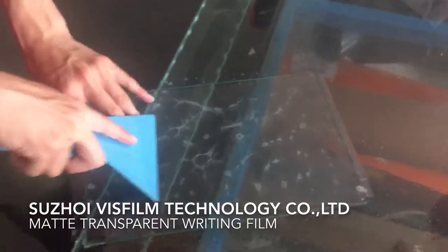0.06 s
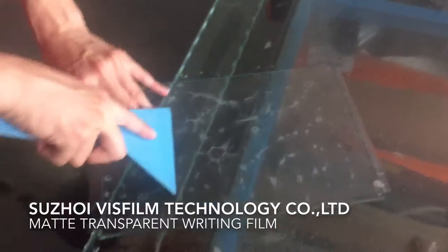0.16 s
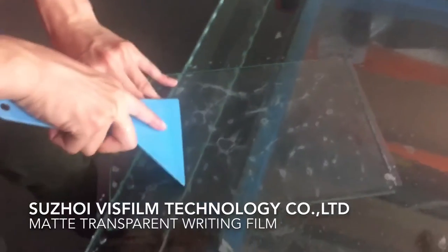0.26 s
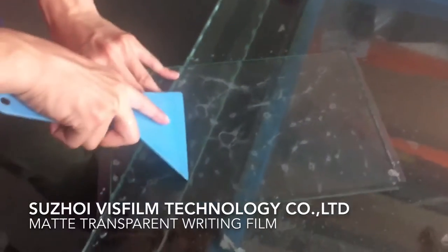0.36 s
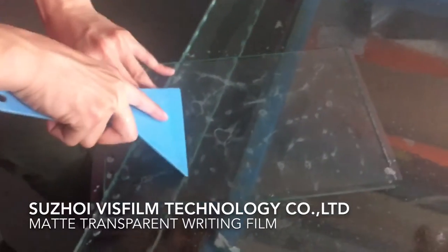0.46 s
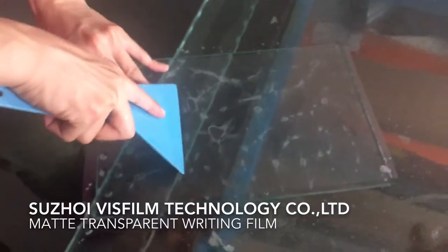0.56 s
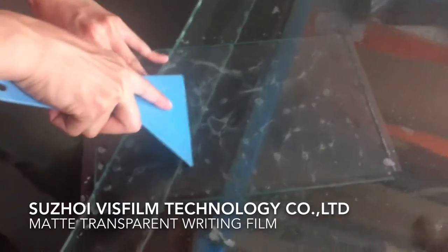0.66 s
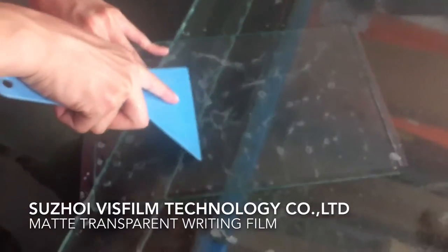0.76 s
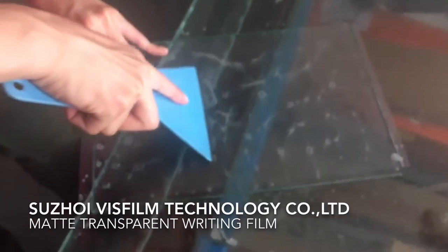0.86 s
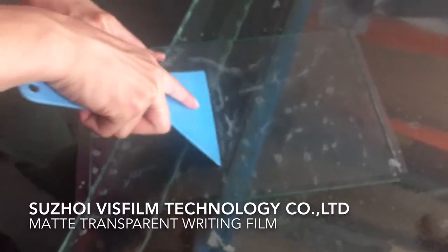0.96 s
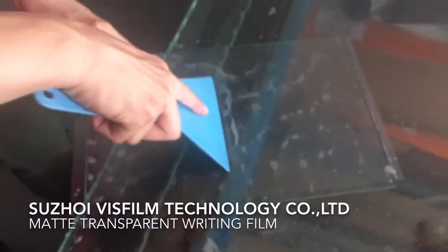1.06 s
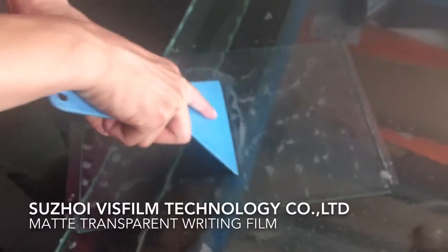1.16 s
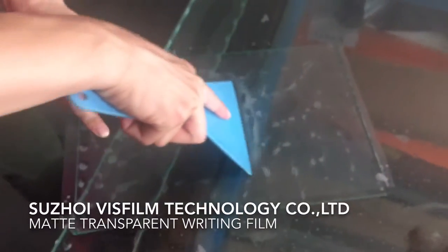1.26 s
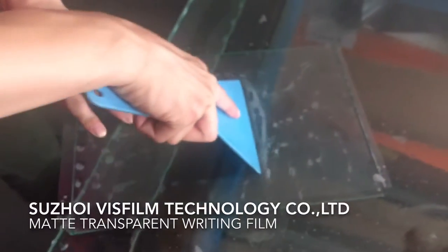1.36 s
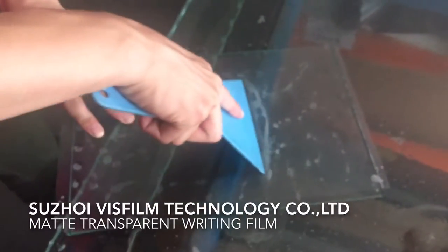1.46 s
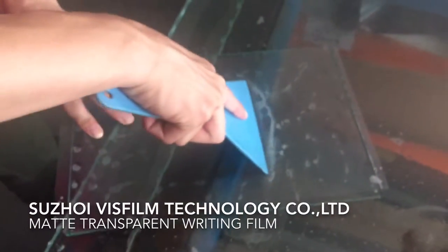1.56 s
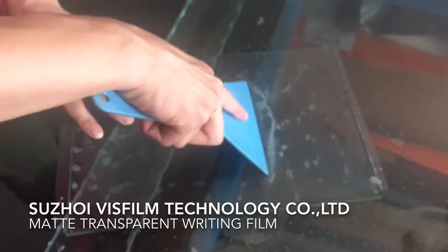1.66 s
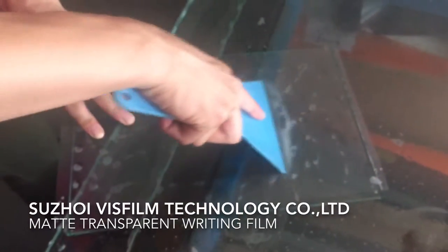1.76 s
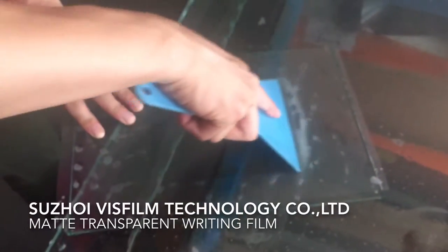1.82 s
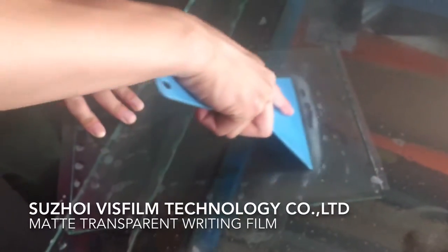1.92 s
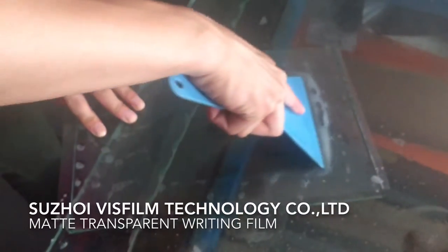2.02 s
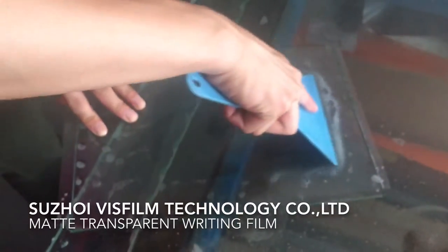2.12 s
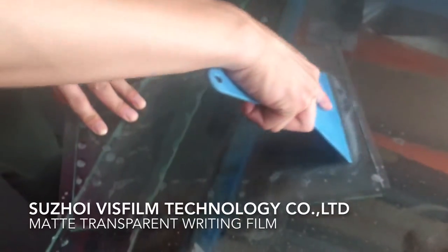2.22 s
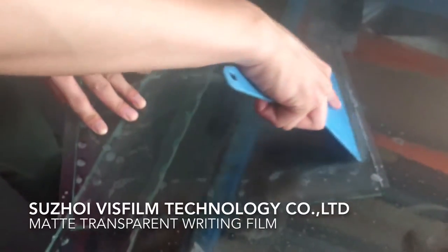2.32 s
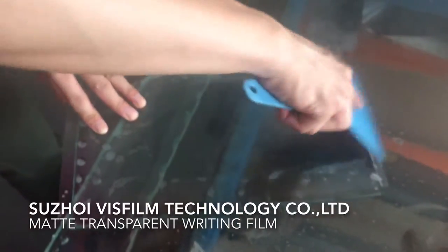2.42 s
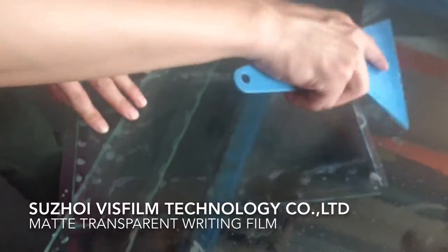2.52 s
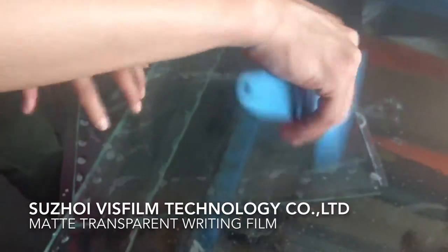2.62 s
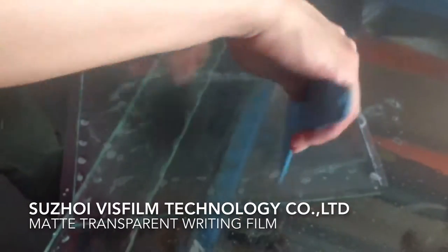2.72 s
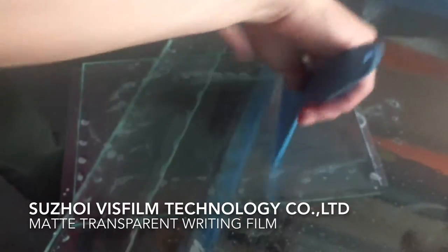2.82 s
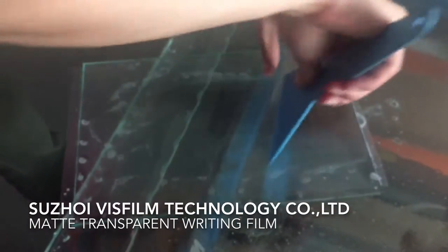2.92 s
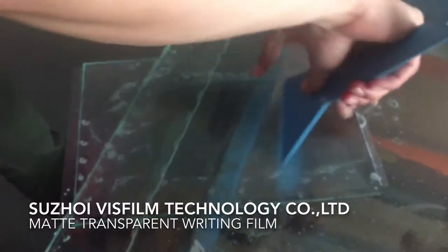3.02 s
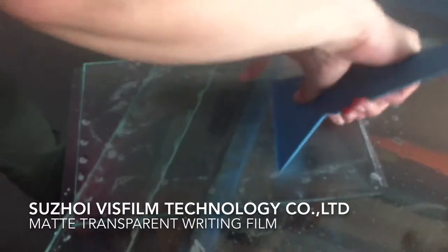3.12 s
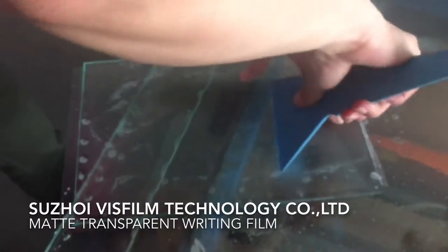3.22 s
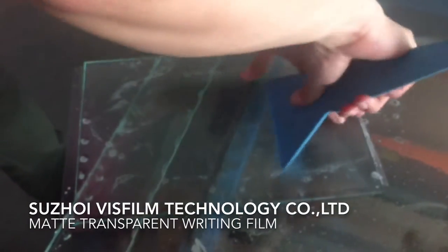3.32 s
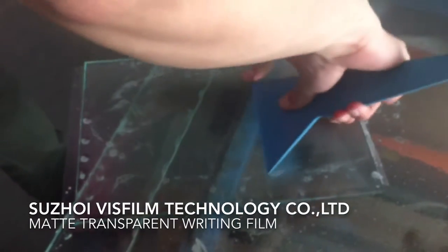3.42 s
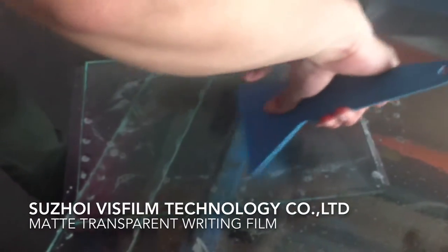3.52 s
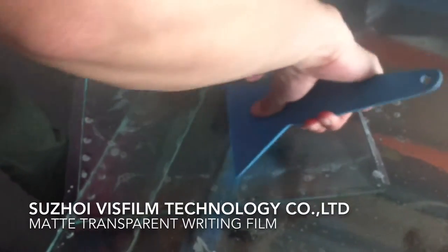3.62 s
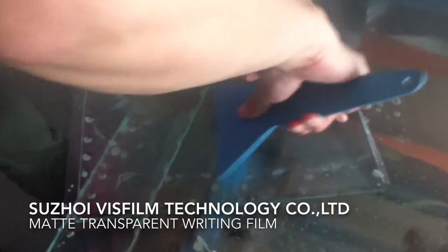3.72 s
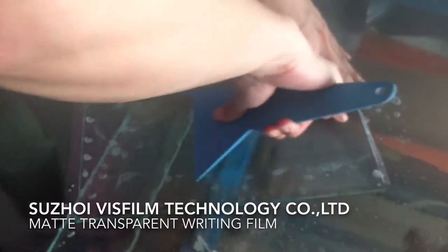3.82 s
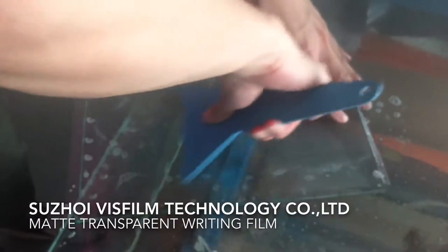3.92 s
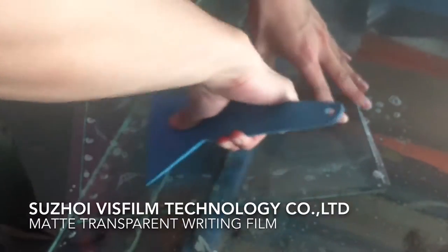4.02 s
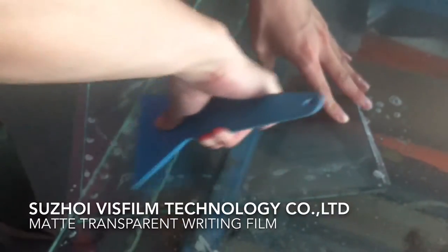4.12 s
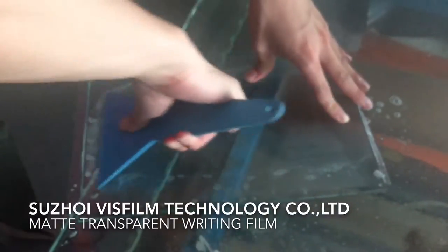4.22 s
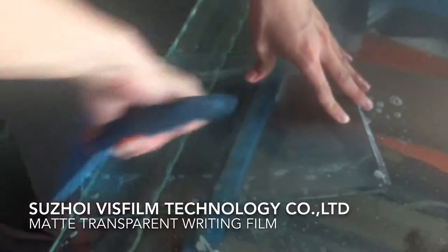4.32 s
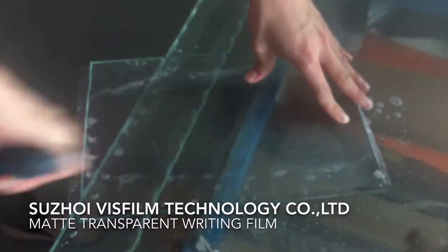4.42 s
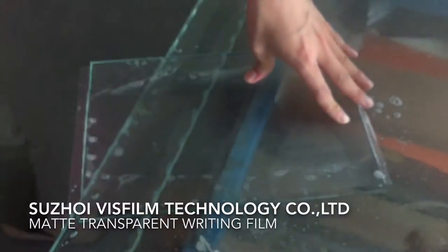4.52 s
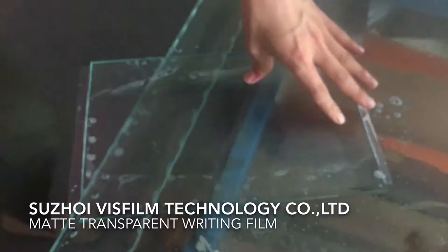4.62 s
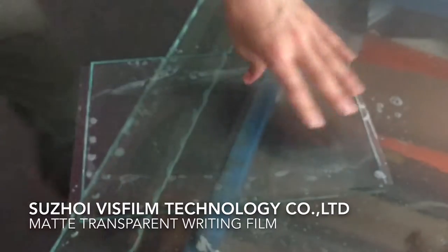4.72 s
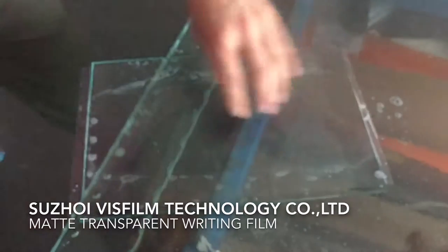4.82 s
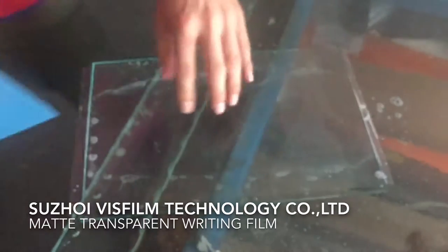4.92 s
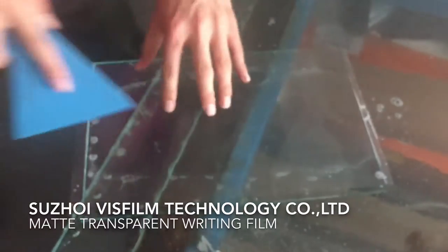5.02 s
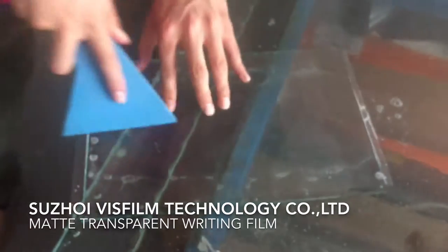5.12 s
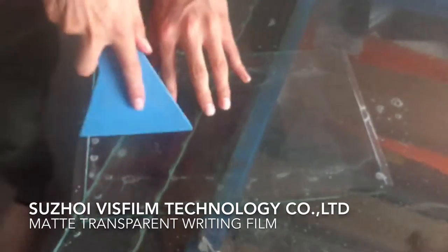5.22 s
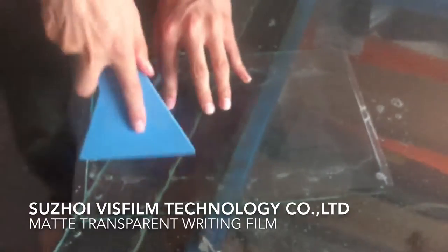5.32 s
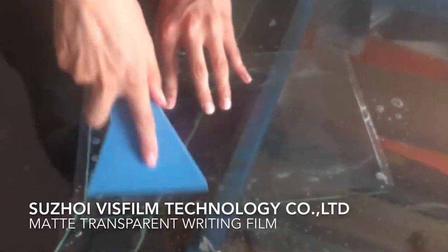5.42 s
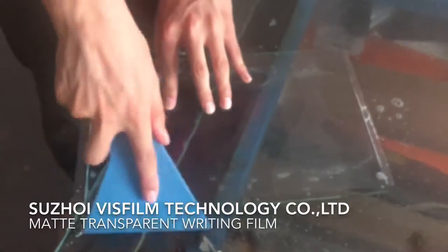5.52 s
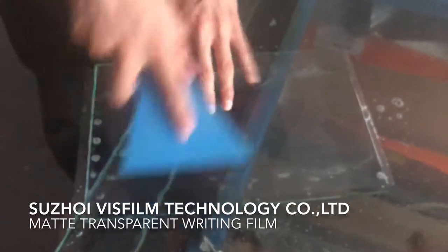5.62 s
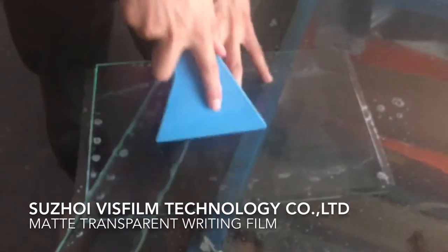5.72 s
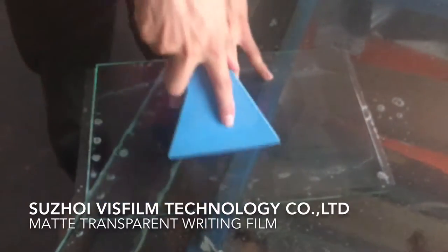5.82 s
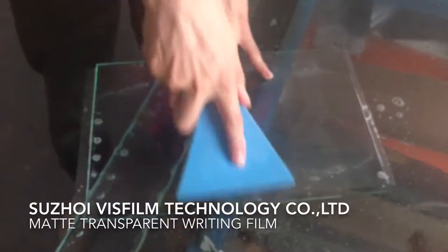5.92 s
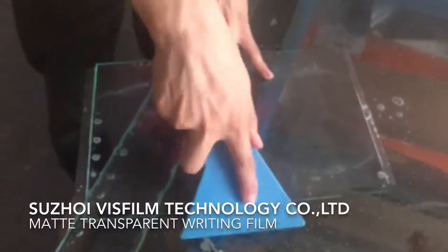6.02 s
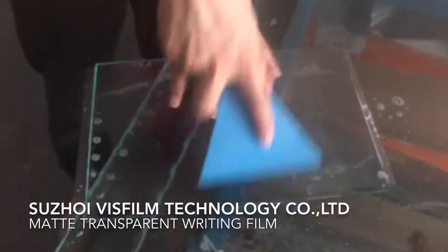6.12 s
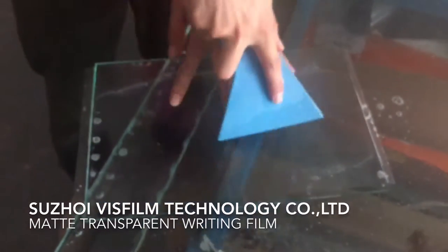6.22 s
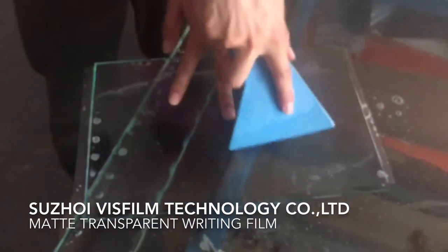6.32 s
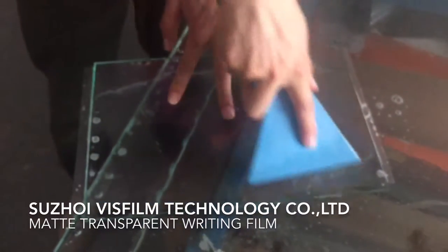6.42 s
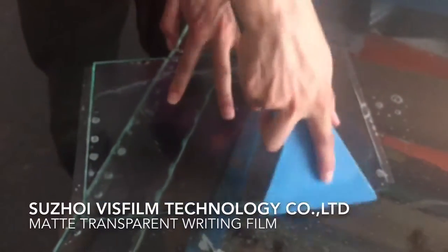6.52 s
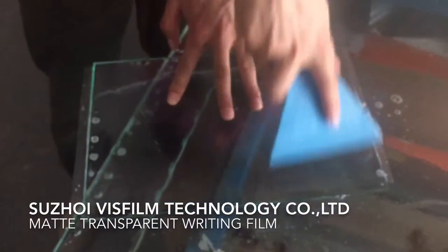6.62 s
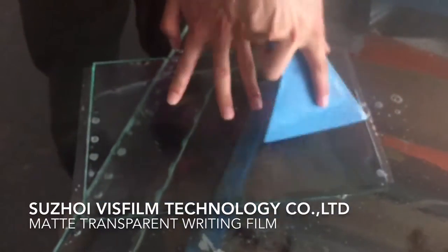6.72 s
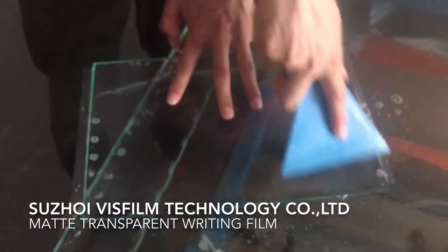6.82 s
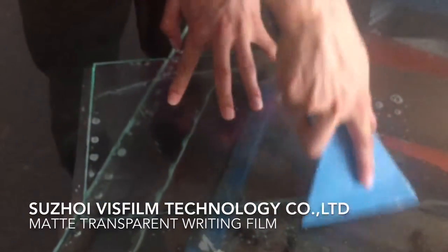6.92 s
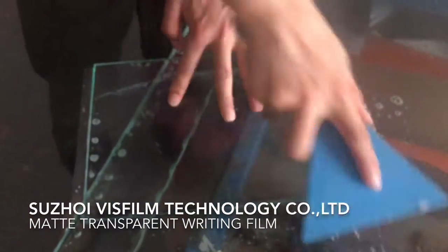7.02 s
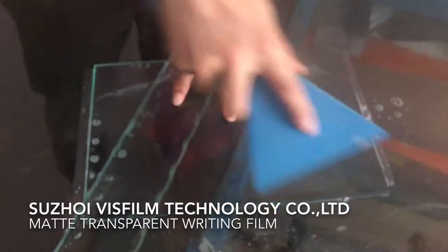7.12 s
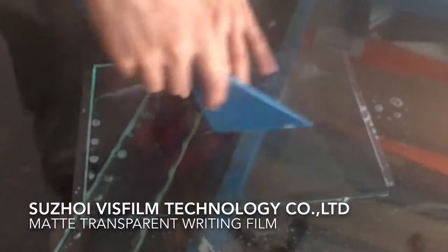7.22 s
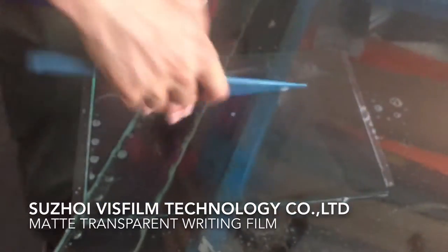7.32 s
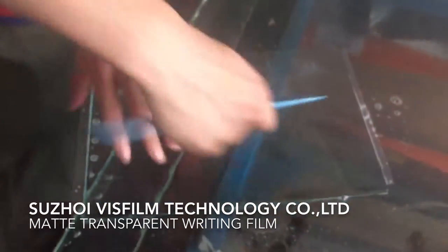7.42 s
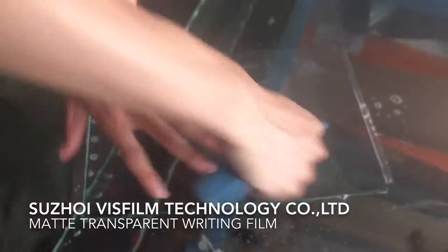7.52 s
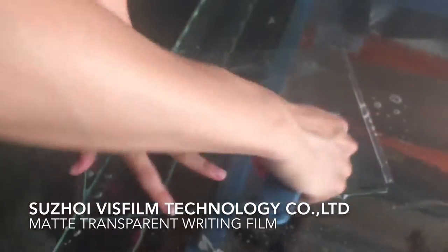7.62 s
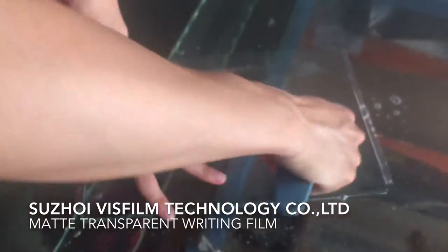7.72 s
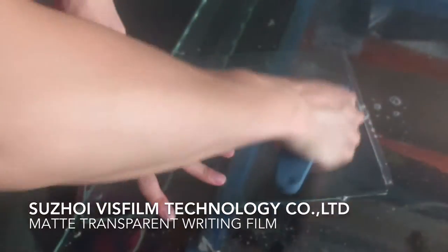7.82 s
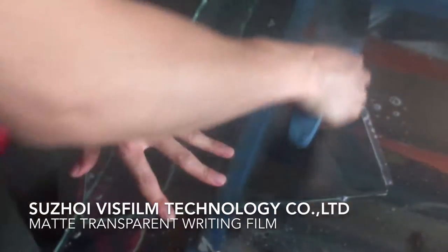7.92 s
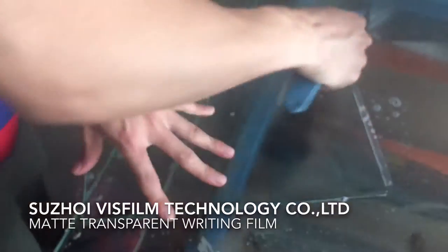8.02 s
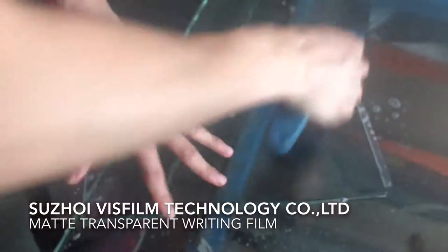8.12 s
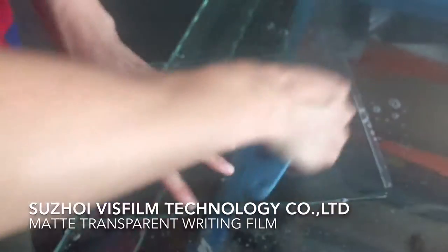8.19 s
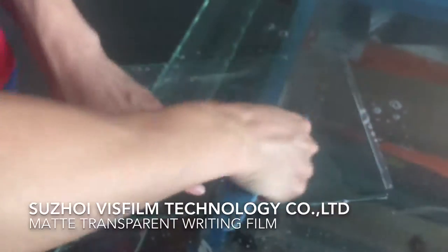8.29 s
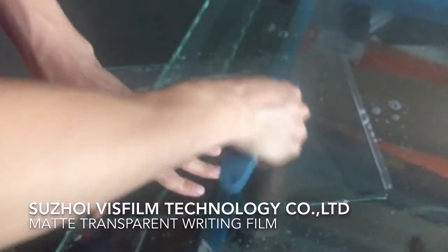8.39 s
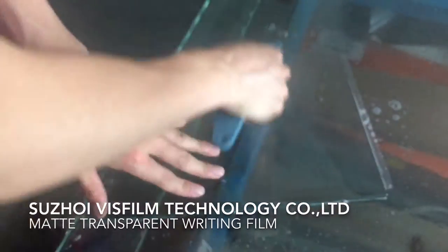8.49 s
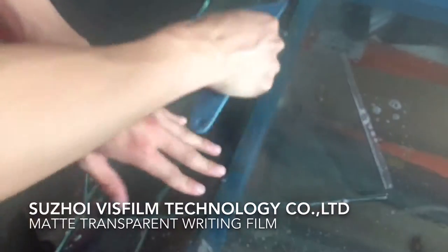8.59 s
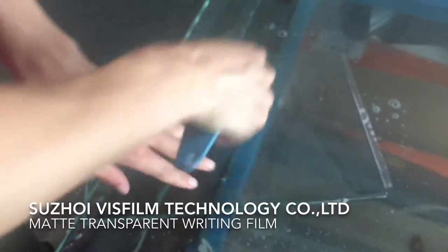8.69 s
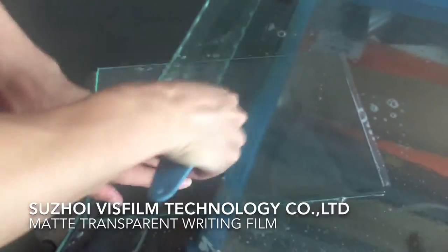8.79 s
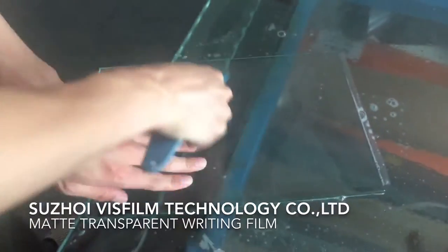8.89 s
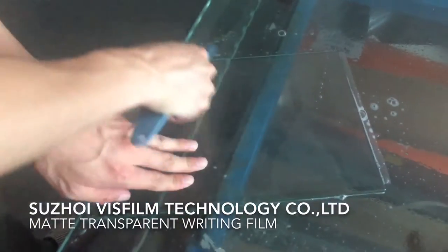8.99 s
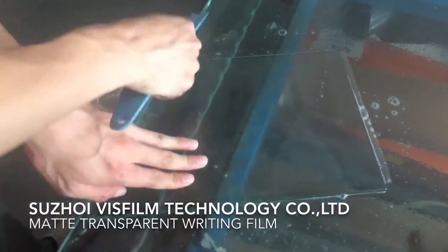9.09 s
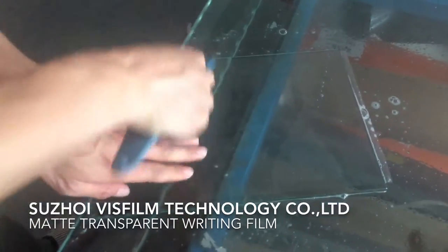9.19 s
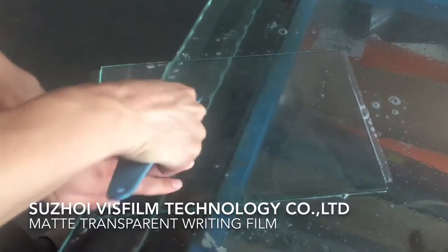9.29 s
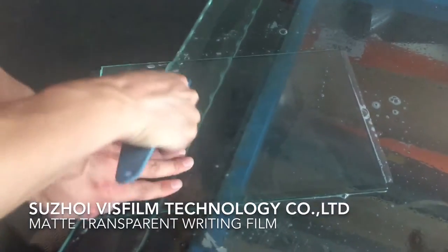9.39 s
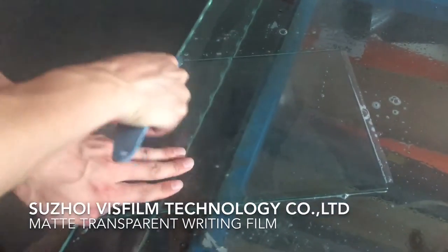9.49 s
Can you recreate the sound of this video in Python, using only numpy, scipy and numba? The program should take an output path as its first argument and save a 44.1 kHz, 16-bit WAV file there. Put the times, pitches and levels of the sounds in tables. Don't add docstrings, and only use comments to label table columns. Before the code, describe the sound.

Close to one microphone in a workshop, a plastic squeegee rubs film on wet glass. Faint short scuffs come first, then brisker hissing rubs, a pause, and louder pulls whose ringing pitch climbs. Hard plastic clacks mark each landing and snap off the edge, with soft bench thumps. Fan hiss, motor hum and low rumble continue underneath.

```python
import sys
import numpy as np
from scipy import signal
from scipy.fft import rfft, irfft
from scipy.io import wavfile
from scipy.ndimage import uniform_filter1d
from numba import njit

SR = 44100
rng = np.random.default_rng(int(sys.argv[2]) if len(sys.argv) > 2 else 0)


def convert_level_to_amplitude(level_db):
    exponent = np.asarray(level_db, float) / 20
    return 10 ** exponent


def int16_out(signal):
    q = np.round(np.clip(np.atleast_2d(signal).T, -1, 1) * 32767)
    wavfile.write(sys.argv[1], SR, q.astype(np.int16))


N = 421155

# [f/Hz, density/dB]
EDGE_SPECTRUM = [(2350, -43), (4000, 0), (4390, -5), (5060, -7.5), (5650, -1.5), (6560, -1), (7480, -7),
                 (9530, -2.5), (10500, -11.5), (11300, -5), (14000, -5.5), (15100, -3), (15800, -11)]


def level(x, db=0):
    return x * convert_level_to_amplitude(db) / np.sqrt(np.mean(x ** 2))


def colour(x, points):
    hz, db = np.transpose(points)
    f = np.maximum(np.fft.rfftfreq(len(x), 1 / SR), 1)
    gain_db = np.interp(np.log(f), np.log(hz), db, left=-90, right=-90)
    return irfft(rfft(x) * convert_level_to_amplitude(gain_db), len(x))


def walk(rate_hz):
    hold = int(SR / rate_hz)
    steps = np.repeat(rng.standard_normal(N // hold + 1), hold)
    return 1.403 * uniform_filter1d(uniform_filter1d(steps, hold), hold)[:N]


@njit
def band(x, hz, sharp):
    y, b, l, k = np.empty(len(x)), 0., 0., 1 / sharp
    for i in range(len(x)):
        g = np.tan(np.pi * hz[i] / SR)
        v = (b + g * (x[i] - l)) / (1 + g * (g + k))
        b, l, y[i] = 2 * v - b, l + 2 * g * v, k * v
    return y


def fixed_band(x, hz, sharp):
    return band(x, np.full(N, float(hz)), sharp)


def slips(spread_db):
    chance = rng.standard_normal(N)
    return level(chance * convert_level_to_amplitude(spread_db * rng.exponential(size=N)))


def rub_moves(t, rub_hz):
    # [middle t/s, length/s, edge hiss/dB, blade ring re hiss/dB]
    rubs = [(.53, .1, -59, -3), (0.707, 0.094, -56, -7), (0.758, .04, -61, -3), (.82, .1, -61, -2),
            (0.947, 0.27, -56.5, 0), (1.055, 0.23, -53, 0.5), (1.186, 0.15, -51.5, 1),
            (1.283, 0.18, -48.5, -1.5), (1.38, 0.2, -53, 1.5), (1.456, .08, -60, 5),
            (1.556, 0.083, -51.5, 2), (2.026, 0.44, -55, 1), (2.142, 0.24, -53, -1), (2.45, 0.17, -43, -8),
            (2.7, 0.44, -67, 2), (3.43, .11, -45.5, -3.5), (3.606, 0.13, -38.5, -9),
            (3.82, 0.14, -37.5, -11), (3.931, 0.15, -53, 2.5), (4.028, 0.14, -36, -15.5),
            (4.231, 0.16, -38.5, -10.5), (4.383, 0.11, -37, -5.5), (4.586, 0.097, -59.5, 0),
            (7.64, 0.5, -56, 1), (2.38, 0.15, -58.5, 6), (1.807, 0.14, -46.5, -7.5),
            (1.88, 0.26, -45.5, -5), (2.303, 0.2, -52.5, 1.5)]
    flank_db, roundness, higher_db = 83.5, 0.29, -0.5
    moves = []
    for s, length_s, db, ring_db in rubs:
        distance = np.hypot((t - s) / length_s, roundness) - roundness
        moves.append((convert_level_to_amplitude(db - flank_db * distance), ring_db, higher_db, 0, rub_hz))
    return moves


def stroke_moves(t):
    # [start t/s, end t/s, edge hiss/dB, blade ring re hiss/dB, first mode at end f/Hz]
    flat_pulls = [
        (5.28, 5.58, -41.5, 2.5, 1780),
        (5.85, 6.04, -42, 4.5, 1990),
        (6.375, 6.582, -41, 2.5, 1930),
    ]
    steep_pushes = [
        (7.785, 8.025, -36.5, 3, 1990),
        (8.345, 8.552, -31.5, -1.5, 1720),
    ]
    edge_wipes = [
        (6.8, 6.94, -38, 2, 1900),
        (8.862, 9.06, -37, -8, 1480),
        (9.44, 9.62, -42, 0.5, 1620),
    ]
    # level/dB, dip at both ends/dB, sharp ones re dense slab/dB
    kinds = [(flat_pulls, (0.15, 700, -11, -15, 1489), (0, 1, 0)),
             (steep_pushes, (0.13, 800, 9, -64, 1338), (4, 5, 4.6)),
             (edge_wipes, (0.15, 320, 11, -12, 1450), (4.5, 3.3, 0))]
    trail_db, trail_fall_db_s = -14, 145
    peak_at = 0.42
    moves = []
    for strokes, grip, higher in kinds:
        attack_s, stop_db_s, growth_db_s, change_db_s, start_hz = grip
        higher_db, dip_db, sharp_db = higher
        for s, end, db, ring_db, end_hz in strokes:
            since = np.clip(t - s, 0, end - s)
            after = np.maximum(t - end, 0)
            speed = np.sin(np.pi / 2 * np.minimum(since / attack_s, 1)) ** 2
            speed *= np.maximum(convert_level_to_amplitude(-stop_db_s * after), convert_level_to_amplitude(trail_db - trail_fall_db_s * after))
            gain = speed * convert_level_to_amplitude(db + growth_db_s * (since - attack_s))
            off_peak = since / (end - s) / peak_at - 1
            hz = np.interp(t, [s, end], [start_hz, end_hz])
            moves.append((gain, ring_db + change_db_s * since,
                          higher_db - dip_db * off_peak ** 2, sharp_db, hz))
    return moves


def skid_moves(t):
    # [t/s, edge hiss/dB, decay/(dB/s), blade ring re hiss/dB, first mode f/Hz]
    skids = [(2.162, -43.5, 38, -3.5, 1340), (3.15, -58, 250, 2, 1630), (5.215, -42, 262, 3, 1530),
             (5.812, -41.5, 60, 2.5, 1240), (6.052, -42.5, 190, -0.5, 1480), (6.31, -47, 60, 5, 1430),
             (6.764, -50, 113, 6, 1230), (7.985, -43, 280, -7, 1800), (8.009, -25, 512, -23, 1740),
             (8.035, -47, 147, -1, 1690), (8.2, -65, -30, 5, 1740), (8.87, -38, 48, -5.5, 1530),
             (9.4, -35.5, 105, -4.5, 1510)]
    max_s, higher_db, climb_hz_s = 0.158, 0.5, 1300
    moves = []
    for s, db, dying_db_s, ring_db, hz in skids:
        since = np.clip(t - s, 0, max_s)
        touch = np.clip(np.minimum((t - s) / 0.0026, (s + max_s - t) / 0.02), 0, 1)
        gain = touch * convert_level_to_amplitude(db - dying_db_s * since)
        moves.append((gain, ring_db, higher_db, 0, hz + climb_hz_s * since))
    return moves


def hand():
    t, rub_hz = np.arange(N) / SR, 1670
    power = np.full((4, N), 1e-14)
    bend = np.full(N, 1e-14 * rub_hz)
    for gain, ring_db, higher_db, sharp_db, hz in rub_moves(t, rub_hz) + stroke_moves(t) + skid_moves(t):
        ring = gain * convert_level_to_amplitude(ring_db)
        higher = gain * convert_level_to_amplitude(higher_db + sharp_db / 2)
        slab = gain * convert_level_to_amplitude(higher_db - sharp_db / 2)
        power += np.array([gain, ring, higher, slab]) ** 2
        bend += ring ** 2 * hz
    return np.sqrt(power), bend / power[1]


def rubbing():
    # [f/Hz, density/dB]
    slab_spectrum = [(1500, -20), (2100, 0.5), (2600, 4), (3000, -3), (3400, -0.5), (4200, 2.5), (4800, -3),
                     (6000, -33)]
    gains, hz = hand()
    hz = np.clip(hz * (1 + 0.03 * walk(40)), 500, 4000)
    patchy_db = 1.33 * walk(70)

    edge = colour(slips(1.2), EDGE_SPECTRUM)
    clumps = 0
    for f in 4600 * 1.17 ** np.arange(8):
        clumps = clumps + convert_level_to_amplitude(2.8 * walk(22)) * band(edge, f * (1 + 0.046 * walk(13)), 11.0)
    hiss = level(edge + 0.32 * clumps) * convert_level_to_amplitude(0.99 * walk(120))

    shake = slips(2.0) / np.sqrt(hz)

    def mode(multiple, sharp, db):
        ring = band(band(shake, multiple * hz, 1.43), multiple * hz, sharp)
        return convert_level_to_amplitude(db + 1.3 * walk(80)) * level(ring)

    focus = np.clip(gains[1] / gains[0] / 1.7, 0.5, 1)
    first = 1.25 * level(focus * mode(1, 8.5, 0) + mode(0.82, 6., -7) + mode(1.25, 5., -7))
    higher = level(mode(1.817, 21.0, -3.6) + mode(2.09, 12.0, -6.5) + mode(2.84, 7.1, -8.5), -4.3)
    slab = level(colour(slips(1.3), slab_spectrum), -3.0)
    return convert_level_to_amplitude(patchy_db) * np.sum(gains * [hiss, first, higher, slab], axis=0)


def clacks():
    # [t/s, peak/dB, ring f/Hz, upper ring re low/dB, crack re low/dB]
    landings = [(0.23, -36, 1740, -22.5, -5), (2.166, -31, 1910, -20, -10), (3.15, -29, 2210, -3, -9),
                (5.208, -9, 945, -3.5, -13), (5.8075, 2.5, 1336, -10, -16), (6.304, -2, 1404, -11, -16.5),
                (6.76, -10.5, 965, -8.5, -17), (7.628, -22.5, 1790, -11, -5), (8.347, -18, 2270, -7, -8),
                (8.865, -19.5, 2240, 6, -1), (9.396, -16.5, 2210, -2, -24)]
    snaps = [(4.398, -23, 1760, -5, -20), (4.4, -19.5, 2140, -2, -15), (4.405, -19, 1580, 5, -6),
             (5.562, -18, 2220, -9, -8), (5.574, -17.5, 1900, -3, -7), (5.591, -26, 1270, 1, -20),
             (6.024, -18, 1860, -16, -9), (6.047, -5.5, 1370, -10, -10.5), (6.584, -22, 1820, -14, -13),
             (6.988, -16.5, 2040, -16, -11), (7.996, -20, 1800, -18, -8), (8.012, -6, 1440, -11, 12),
             (8.016, -28, 1920, -14, 11), (8.027, -8, 1710, -11, -11), (8.571, -18, 2100, -29, -18),
             (9.025, -27, 1400, -1, -14), (9.032, -22, 1246, -14, -11), (9.047, -16.5, 1780, 5, -4),
             (9.068, -23.5, 1420, 3, -18)]
    # [f/Hz, T60/s]
    upper_modes = [(2050, 0.018), (2400, 0.0046), (2880, 0.024), (3400, 0.018), (3850, 0.013),
                   (4400, 0.013), (5900, 0.0075), (6700, 0.0089)]
    low_modes = [(0.956, 1.0, 19), (1.319, 1.0, 12.8), (0.798, 0.63, 14.6),
                 (1.513, 0.47, 10.2)]
    size = 4096
    out, t = np.zeros(N + size), np.arange(size) / SR
    bent = t + 0.00025 * (1 - np.exp(-t / 0.0005))

    def ring(f, t60_s):
        return np.sin(2 * np.pi * f * bent) * convert_level_to_amplitude(-60 * t / max(t60_s, 0.002))

    thud = ring(336, 0.032) + 0.69 * ring(432, 0.028)
    for touches, full_scale_thud_db in ((landings, -21.5), (snaps, -28.5)):
        for s, db, hz, upper_db, crack_db in touches:
            noise = rng.standard_normal(size)
            low = sum(g * ring(m * hz, cycles / hz) for m, g, cycles in low_modes)
            low *= 1 - np.exp(-t / 0.00091 * (hz / 1000) ** 3)
            upper = 0
            for (f, t60_s), sign, spread in zip(upper_modes, noise, noise[8:]):
                gain = np.sign(sign) * convert_level_to_amplitude(2.4 * spread) * min(1, (4300 / f) ** 2)
                upper = upper + gain * ring(f, t60_s)
            crack_decay = convert_level_to_amplitude(-60 * t / 0.0074) + convert_level_to_amplitude(-26.0 - 60 * t / 0.082)
            crack = crack_decay * level(colour(noise, EDGE_SPECTRUM))
            thud_db = full_scale_thud_db - 0.41 * db
            hit = 1.03 * low + convert_level_to_amplitude(upper_db - 7.5) * upper
            hit += convert_level_to_amplitude(crack_db + 3.5) * crack + convert_level_to_amplitude(thud_db) * thud
            hit *= 1 - np.exp(-t / 0.00019)
            i = int((s + 0.0003) * SR)
            out[i:i + size] += convert_level_to_amplitude(db) * hit / np.abs(hit).max()
    return out[:N]


def thumps():
    # [t/s, level/dB, f/Hz, T60/s]
    bumps = [(2.17, -35, 139, 0.32), (4.47, -41, 129, 0.15), (6.47, -34.5, 330, 0.08),
             (7.0, -40.5, 300, 0.51), (8.86, -35.5, 203, 0.11), (9.398, -32, 417, 0.06),
             (5.81, -48, 650, 0.18), (6.969, -45, 616, 0.44), (7.66, -49.5, 690, 0.55)]
    t, noise, out = np.arange(N) / SR, rng.standard_normal(N), 0
    for s, db, hz, t60_s in bumps:
        since = np.maximum(t - s, 0)
        burst = level(fixed_band(fixed_band(noise, hz, 1.4), hz, 1.4), db)
        out = out + burst * (1 - np.exp(-since / 0.0092)) * convert_level_to_amplitude(-60 * since / t60_s)
    return out


def room(x):
    t60_s, tail_db = 0.41, -19.5
    t = np.arange(SR // 2) / SR
    noise = rng.standard_normal(len(t))
    dull = uniform_filter1d(noise, size=6)
    tail = (dull + 0.67 * noise * np.exp(-t / 0.028)) * convert_level_to_amplitude(-60 * t / t60_s)
    tail *= np.clip(t / 0.006 - 0.6, 0, 1)
    return signal.fftconvolve(x, tail * convert_level_to_amplitude(tail_db) / np.sqrt(np.sum(tail ** 2)))[:N]


def squeal():
    # [t/s, f/Hz, partials/dB, breakup hiss/dB]
    course = [
        (7.43, 850, -86, -78),
        (7.48, 848, -69, -72),
        (7.53, 846, -60, -70),
        (7.552, 846, -60, -60),
        (7.57, 846, -75, -53),
        (7.62, 846, -85, -57),
        (7.68, 846, -94, -64),
        (7.72, 880, -90, -82),
    ]
    # [multiple, level/dB]
    orders = [(8, -2), (9, -9), (10, -9), (11, 0), (12, 4.5), (13, 0), (15, -12), (16, -14), (18, -16)]
    s, hz, db, hiss_db = np.transpose(course)
    t = np.arange(N) / SR
    phase = 2 * np.pi * np.cumsum(np.interp(t, s, hz) * (1 + 0.003 * walk(90))) / SR
    lines = sum(convert_level_to_amplitude(g + 3.1 * walk(110)) * np.sin(m * phase) for m, g in orders)
    hiss = level(fixed_band(fixed_band(rng.standard_normal(N), 10000, 3.), 10000, 3.))

    def gain(curve_db):
        return convert_level_to_amplitude(np.interp(t, s, curve_db, left=-200, right=-200))

    return lines * gain(db) + hiss * gain(hiss_db)


def workshop():
    # [f/Hz, density/dB]
    fan_spectrum = [(210, -17), (350, -11), (480, -14), (780, -10), (1000, -5.5), (1450, -4), (1870, -1),
                    (2600, -0.5), (2950, 0), (3300, -3.5), (3600, -6.5), (4600, -15.5), (7000, -24.5),
                    (15800, -36)]
    # [f/Hz, level/dB]
    hall_modes = [(420, -75.5), (535, -70), (670, -75.5), (975, -71.5), (3000, -65)]
    # [f/Hz, density/dB]
    rumble_spectrum = [(18, -37), (30, -13), (64, -1.5), (87, 0.5), (201, -7.5), (236, -13.5), (267, -9.5),
                       (293, -14), (450, -18.5), (580, -72), (990, -120)]
    # [t/s, level/dB]
    rumble_course = [(0.0, -50.5), (0.24, -51), (0.45, -59), (0.61, -50), (2.07, -46), (2.13, -53),
                     (2.18, -45), (2.26, -49.5), (4.79, -50.5), (5.48, -48), (5.53, -51), (6.94, -47.5),
                     (7.1, -41), (7.32, -49), (9.39, -52), (9.42, -48.5), (9.55, -52.5)]
    # [f/Hz, level/dB]
    hum_lines = [(66.5, -69), (133, -58), (199, -66), (266, -61)]
    t = np.arange(N) / SR

    air = level(colour(slips(0.3), fan_spectrum), -48)
    dull = fixed_band(air, 600, 1.3)
    fans = (air - dull) * convert_level_to_amplitude(0.2 * walk(1.48) + 0.7 * walk(8.5))
    fans += dull * convert_level_to_amplitude(1.1 * walk(2.5) + 2.8 * walk(15))
    for hz, db in hall_modes:
        fans += level(band(air, hz * (1 + 0.04 * walk(3)), 24.0), db) * convert_level_to_amplitude(4.0 * walk(9))

    s, course_db = np.transpose(rumble_course)
    rumble_db = np.interp(t, s, course_db)
    rumble = colour(rng.standard_normal(N), rumble_spectrum)
    deep = level(fixed_band(rumble, 65, 1.77))
    upper = level(fixed_band(rumble, 200, 1.07)) * convert_level_to_amplitude(-3.5 + 0.78 * walk(4) + 1.34 * walk(25))

    hum = 0
    for hz, db in hum_lines:
        phase = 2 * np.pi * np.cumsum(hz * (1 + 0.00756 * walk(6.7))) / SR
        hum = hum + convert_level_to_amplitude(db + 3.4 * walk(5)) * np.sin(phase)
    hum *= convert_level_to_amplitude(0.76 * (rumble_db - np.median(course_db)))
    return fans + (deep + upper) * convert_level_to_amplitude(rumble_db) + hum


def scene():
    near = rubbing() + clacks()
    lag = int(0.00159 * SR)
    near[lag:] += 0.031 * near[:-lag]
    return np.tile(near + room(near) + thumps() + squeal() + workshop(), (2, 1))


def band_limit(x):
    return signal.sosfilt(signal.butter(12, 16710, fs=SR, output="sos"), x)


def record(dry):
    top = signal.ellip(7, 0.2, 52, 16200, fs=SR, output="sos")
    return band_limit(signal.sosfilt(top, np.clip(dry, -0.9, 0.9)))


dry = scene()
out = record(dry)
int16_out(out)
```